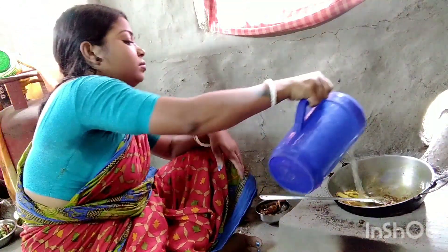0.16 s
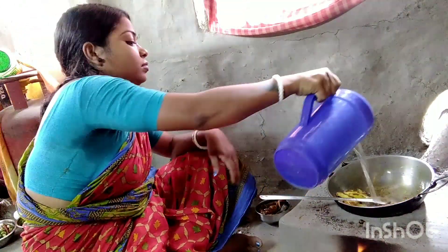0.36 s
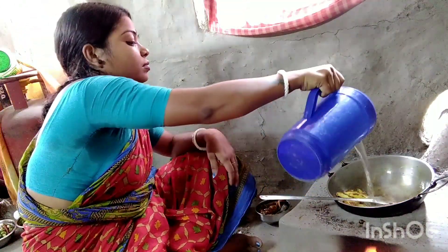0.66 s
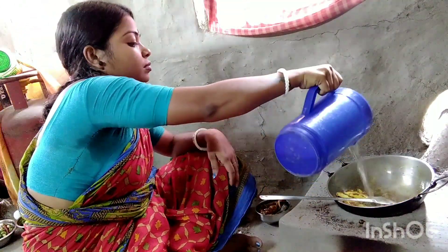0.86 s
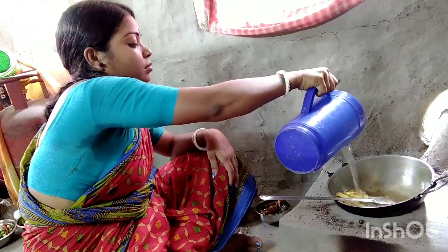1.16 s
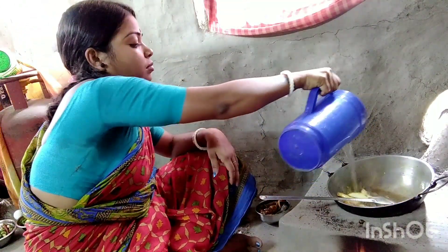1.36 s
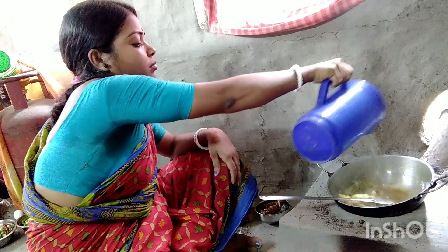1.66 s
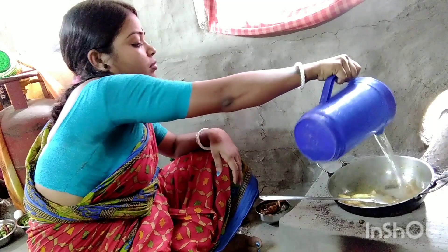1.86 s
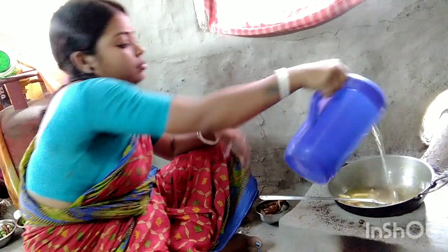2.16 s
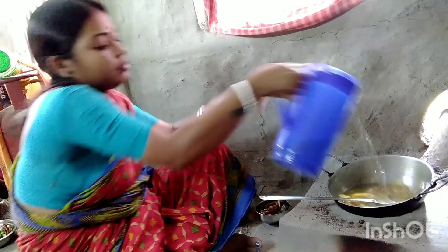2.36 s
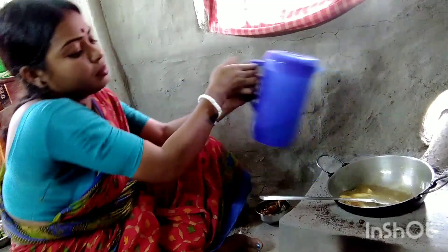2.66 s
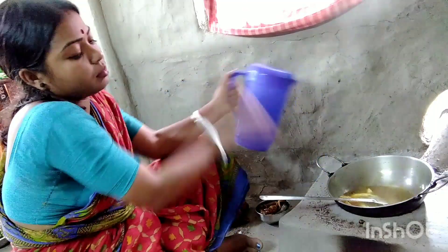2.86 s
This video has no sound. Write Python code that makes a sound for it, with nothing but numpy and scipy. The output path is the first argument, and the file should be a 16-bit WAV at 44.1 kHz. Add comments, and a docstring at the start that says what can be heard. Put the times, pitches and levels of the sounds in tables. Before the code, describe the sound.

A fierce hiss of steam erupts as water lands in a frying pan, with coarse boiling crackle and faint metallic ringing, easing into sparse spitting; close stereo microphone, pan slightly right, short room reflections, soft low rumble.

```python
"""At a stove beside a plastered wall, water is poured from a jug into a steel pan of spices in hot oil.
The frying flares into a dense sizzle: random steam bursts and filtered noise. Coarser boiling crackles,
bubbles sound as short rising notes, and random knocks excite the resonances of the pan.
As the pan cools the sizzle sinks and single spits, shaped noise, stand out. Water slaps and gurgles;
low filtered noise and wavering sines make the rumble, drone and hum underneath."""
import sys
import numpy as np
from scipy import signal
from scipy.fft import rfft, irfft
from scipy.io import wavfile
from scipy.ndimage import uniform_filter1d, map_coordinates

SR = 44100
rng = np.random.default_rng(int(sys.argv[2]) if len(sys.argv) > 2 else 0)


def waveform_to_disk(signal):
    """Save audio, clipped to [-1, 1], as 16-bit WAV at the path in sys.argv[1]."""
    frames = np.transpose(np.atleast_2d(signal))
    scaled = np.clip(frames, -1, 1) * 32767
    samples = np.round(scaled).astype(np.int16)
    wavfile.write(sys.argv[1], SR, samples)


N = 132300
T = np.arange(N) / SR
FREQS = np.maximum(np.arange(N // 2 + 1) * SR / N, 1)
PORT_LAG_S = 0.0002

# Spectrum of the sizzle at the two microphone ports.
# Each row: frequency in Hz, left relative level in dB, right relative level in dB.
FIZZ_SPECTRUM = [(500, -49, -64), (2500, -34.5, -34), (4060, -18, -16), (5080, -13.5, -11.5),
                 (6320, -12.5, -7), (7130, -7, -1), (7350, -9, -2), (8360, -3.5, -7), (9150, -3, -8),
                 (10000, -5, -13), (11040, -8.5, -17.5), (11950, -13, -14.5), (14500, -15, -18.5)]
# Strength of the pan's ringing, which the churning water follows more weakly.
# Each row: time in seconds, relative level in dB.
RINGING_LEVEL = [(0, -62.5), (.32, -56.5), (.42, -54.5), (.8, -52), (1.1, -49), (1.6, -50), (2.1, -52),
                 (2.6, -53.5), (3, -55)]


def undb(db):
    """Amplitude ratio: 20 dB is a factor of ten."""
    return 10 ** (np.asarray(db) / 20)


def unit(x):
    """Normalization: scale to an rms of 1."""
    return x / np.sqrt(np.mean(x ** 2))


def curve(rows):
    """Envelope: gain over time, interpolated in dB between (s, dB) points."""
    return undb(np.interp(T, *np.array(rows).T))


def colour(x, rows):
    """Linear filtering: weight the spectrum by (Hz, dB) points, one dB column for all or one per channel."""
    hz, *columns = np.array(rows, float).T
    gains_db = [np.interp(np.log(FREQS), np.log(hz), column) for column in columns]
    return irfft(rfft(x) * undb(gains_db), N)


def resonate(x, hz, width_hz):
    """Simple resonance: gain 1 at the centre, 3 dB down at the edges of its width."""
    return irfft(rfft(x) / (1 + 1j * (FREQS - hz * hz / FREQS) / width_hz), N)


def noise():
    """Incoherence: unrelated white noise for the two channels."""
    return rng.standard_normal((2, N))


def flutter(rate, depth_db):
    """Random modulation: a smooth gain made from rate random steps a second."""
    k = int(SR / rate)
    steps = np.repeat(rng.standard_normal(N // k + 2), k)
    smooth = uniform_filter1d(uniform_filter1d(steps, k), k)[:N]
    return undb(depth_db * 1.3 * smooth)  # 1.3 makes up for the spread lost in smoothing


def pops(per_s, scatter_db):
    """Random point process: many weak bursts and few strong; each reaches the two ports differently."""
    size = undb(scatter_db * np.minimum(rng.exponential(size=N), 5))
    happens = rng.random(N) < per_s / SR
    return unit(happens * size * noise())


def smear(ticks, decay_s):
    """Exponential energy decay: each tick trails off as a brief spurt of noise."""
    power = np.mean(ticks ** 2, axis=0)
    energy = signal.lfilter([1], [1, -np.exp(-1 / (SR * decay_s))], power)
    return unit(np.sqrt(energy) * noise())


def burst(start, attack, decay):
    """Transient envelope: a quick linear rise and an exponential fall."""
    age = np.maximum(T - start, 0)
    return np.minimum(age / attack, 1) * np.exp(-np.maximum(age - attack, 0) / decay)


def ports(x):
    """Time difference of arrival: the pan stands to the right, so the left port hears it later."""
    return np.array([np.interp(T - PORT_LAG_S, T, x), x])


def room(x):
    """Reverberation: direct sound plus a short diffuse tail from the walls."""
    t60_s, tail_gain = 0.11, undb(10)
    tail = noise() * undb(-60 * T / t60_s)
    tail /= np.sqrt(np.sum(tail ** 2, axis=1, keepdims=True))
    reflected = irfft(rfft(x) * rfft(tail), N)
    return (x + tail_gain * reflected) / np.hypot(1, tail_gain)


def sizzle():
    """Flash boiling: tiny steam bursts, each a tick and a brief spurt, over the hiss of the vapour."""
    # Each row: time in seconds, relative level in dB.
    sizzle_level = [(0, -41.5), (.25, -40), (.3, -36.5), (.36, -32.5), (.43, -30.5), (.5, -32.5),
                    (.55, -30.5), (.7, -29.5), (1.02, -30), (1.15, -28.5), (1.28, -30), (1.48, -29),
                    (1.6, -30.5), (1.665, -29.5), (1.7, -32.5), (1.87, -33), (2.13, -31.5), (2.25, -33),
                    (2.32, -34.5), (2.365, -36.5), (2.43, -35), (2.565, -39.5), (2.6, -37.5), (2.72, -37),
                    (2.84, -38.5), (3, -39.5)]
    peak_bursts_per_s, scatter_db, burst_decay_s = 7000, 1, 0.0025
    steam_share, tick_share = 0.78, 0.13  # of the power
    strength = curve(sizzle_level)
    density = strength / strength.max()
    # Bursts come more often as the sizzle grows; the division keeps their mean power even.
    ticks = pops(peak_bursts_per_s * density, scatter_db) / np.sqrt(density)
    spurts = smear(ticks, burst_decay_s)
    grains = np.sqrt(tick_share) * unit(ticks) + np.sqrt(1 - tick_share) * spurts
    mix = np.sqrt(1 - steam_share) * grains + np.sqrt(steam_share) * noise()
    return unit(shimmer(colour(mix, FIZZ_SPECTRUM), depth_db=0.88)) * strength


def shimmer(x, depth_db, count=7):
    """Band-wise modulation: overlapping bands flicker on their own as clusters of bursts come and go."""
    centres_hz = np.linspace(3000, 14000, count)
    spectrum = rfft(x)
    out = 0
    for band in np.eye(count):
        weight = np.interp(FREQS, centres_hz, band)  # triangles; the end bands extend outward
        out = out + irfft(spectrum * weight, N) * flutter(70, depth_db)
    return out


def spits():
    """Transient radiation: single drops boil off in the oil, each in a short, bright spurt."""
    # Each row: start in seconds, level in dB, decay in seconds, centre in Hz.
    drops = [(0.095, -34, .007, 7000), (.187, -36.5, .018, 7700), (.299, -37, .02, 10500),
             (.35, -29, 0.0086, 7300), (.852, -28, 0.012, 8000), (1.459, -25, .008, 7640),
             (1.655, -25.5, .009, 7600), (2.065, -35, 0.049, 5730), (2.136, -35, 0.046, 5900),
             (2.387, -31, .007, 7100), (2.6, -32, 0.0084, 9500), (2.614, -31, .005, 7040),
             (2.666, -38, .005, 7600), (2.69, -35, 0.014, 9000), (2.756, -34, .007, 7500),
             (2.784, -32.5, .008, 6900), (2.854, -31, .007, 6460), (2.895, -38, 0.0054, 9000)]
    attack_s, width_hz = 0.0014, 540
    spurt = colour(noise(), FIZZ_SPECTRUM)
    out = 0
    for start, db, decay, hz in drops:
        out = out + undb(db) * unit(resonate(spurt, hz, width_hz)) * burst(start, attack_s, decay)
    return out


def boiling():
    """Nucleate boiling: larger steam blisters crackle lower down, and small simmering bubbles ring."""
    # Each row: time in seconds, relative level in dB.
    boil_level = [(0, -50.5), (.12, -50), (.29, -50), (.37, -45), (.62, -41), (.74, -41.5), (.84, -43),
                  (1, -43.5), (1.16, -41.5), (1.3, -41.5), (1.5, -42), (1.8, -44), (2.03, -47), (2.2, -45),
                  (2.38, -50), (2.47, -49), (2.56, -54), (2.62, -49.5), (2.76, -49), (3, -52.5)]
    # Each row: frequency in Hz, left relative level in dB, right relative level in dB.
    crackle_spectrum = [(400, -28, -23), (1000, -20, -14), (1700, -10, -6.5), (2100, -5, -3),
                        (2600, -2.5, -3), (3050, .5, -.5), (3400, -2.5, -3.5), (4100, 1.5, -.5),
                        (5300, -5, 1.5), (8000, -24, -19)]
    ticks = pops(2200, scatter_db=1.5)
    blisters = unit(room(undb(-4) * ticks + smear(ticks, decay_s=0.0036)))
    crackle = unit(slosh(colour(blisters, crackle_spectrum), depth_db=.4))
    simmer = bubbles(3500, octaves=.45, cycles=30, count=1500)
    boil = crackle + undb(-2) * unit(colour(simmer, crackle_spectrum))
    return unit(boil) * curve(boil_level) * flutter(35.52, 0.72)


def pan():
    """Forced vibration: stream and bursts ring the pan unevenly; air dragged under bubbles up."""
    # Each row: resonance in Hz, width in Hz, left relative level in dB, right relative level in dB.
    resonances = [(694, 29, 0.5, 1), (805, 67, 1, 1), (1001, 88, 0, 0), (1116, 84, -40, 1.5),
                  (1322, 65, -0.5, 7), (1674, 140, -9.5, 0), (1893, 127, -3, 3), (2053, 44, -3, -4)]
    knocks = pops(1400, scatter_db=1)
    drive = ports(knocks[0]) + 0.76 * noise()  # shared knocks plus a part unrelated between ports
    ring = 0
    for hz, width, left, right in resonances:
        mode = resonate(resonate(drive, hz, width), hz, 4 * width)  # second pass steepens the skirts
        ring = ring + undb([[left], [right]]) * mode * flutter(25, 1.2)
    air = bubbles(1900, octaves=.25, cycles=14, count=260)
    return (unit(slosh(ring, depth_db=.18)) + undb(-8) * air) * curve(RINGING_LEVEL)


def bubbles(centre_hz, octaves, cycles, count):
    """Bubble resonance: scattered sizes ring in short rising notes, all over the pan."""
    rise = .2
    out, age = np.zeros((2, 2 * N)), T[:SR // 12]
    moments, pitches = rng.random(count), rng.standard_normal(count)
    sizes, places = rng.exponential(size=count), rng.standard_normal(count)
    for when, pitch, size, place in zip(moments, pitches, sizes, places):
        hz = centre_hz * 2 ** (octaves * np.clip(pitch, -2, 2))
        life = age * hz / cycles  # age in decay times
        bend = 1 + rise / cycles * np.minimum(life, 2)
        note = np.sqrt(size) * np.sin(2 * np.pi * hz * age * bend) * np.exp(-life)
        left_lag_s = PORT_LAG_S * abs(1 + place / 2)
        for channel, lag_s in enumerate([left_lag_s, 0]):
            at = int(when * N + lag_s * SR)
            out[channel, at:at + len(age)] += note
    return unit(room(out[:, :N]))


def slosh(x, depth_db):
    """Varying resonance: moving water shifts pitch up and down; depth is the pitch ratio's spread in dB."""
    speed = flutter(24, depth_db)
    place = np.cumsum(speed / speed.mean())
    return np.array([map_coordinates(channel, [place], mode="mirror") for channel in x])


def splats():
    """Impact noise: the uneven stream lands in gouts, each a short wet slap on the pan."""
    # Each row: start in seconds, level in dB, centre in Hz.
    gouts = [(.173, -40.5, 2940), (0.178, -50, 1400), (0.331, -36, 3280), (0.473, -34, 3240),
             (0.508, -44, 1100), (1.165, -36, 2900), (1.268, -40, 3300), (1.445, -44, 1480),
             (1.709, -47, 1310), (1.915, -47, 1300), (1.948, -34.5, 3500), (2.02, -47, 1170),
             (2.112, -49, 3000), (2.27, -50, 1400), (2.413, -48.5, 1250), (2.465, -50, 3400),
             (2.61, -43, 3320), (2.728, -48, 3000), (2.8, -48, 3600)]
    attack_s, decay_s, relative_width = 0.002, 0.0081, 0.65  # width as a share of the centre, per pass
    out = 0
    for start, db, hz in gouts:
        width_hz = hz * relative_width
        wet = resonate(resonate(noise(), hz, width_hz), hz, width_hz)
        out = out + undb(db) * unit(wet) * burst(start, attack_s, decay_s)
    return out


def churn():
    """Flow noise: the stream stirs the pooled water with a soft, low gurgle."""
    # Each row: frequency in Hz, relative level in dB.
    churn_spectrum = [(80, 1.5), (160, -0.5), (270, 2), (410, -3.5), (470, -0.5), (545, -8), (700, -4),
                      (1500, -21.5), (5000, -42)]
    water = unit(colour(ports(noise()[0]) + 0.44 * noise(), churn_spectrum))
    swell = unit(curve(RINGING_LEVEL) ** 0.32)  # follows the ringing, compressed
    return undb(-60) * water * swell * flutter(24.54, 1.3)


def background():
    """Coherent low sound: a rumble alike in both ports but for the lag, a swelling drone, a wavering hum."""
    # Each row: frequency in Hz, relative level in dB.
    rumble_spectrum = [(15, -5.5), (30, -5), (48, 5.5), (62, -10), (78, 4.5), (98, -7), (120, -13),
                       (200, -34), (600, -71)]
    # Rumble, then drone. Each row: time in seconds, level in dB (relative, for the drone).
    rumble_level = [(0, -62), (.3, -62), (.57, -58), (.8, -64), (1.22, -70), (1.41, -56), (1.62, -65),
                    (2.2, -63.5), (3, -66)]
    drone_level = [(0, -68), (.16, -57), (.42, -57.5), (.7, -69), (1.2, -75), (1.4, -64), (1.65, -64),
                   (1.85, -89), (2.5, -76), (3, -67)]
    # Each row: multiple of the hum's fundamental, level in dB.
    hum_partials = [(1, -62.5), (2, -75.5)]
    rumble = unit(colour(ports(noise()[0]), rumble_spectrum)) * curve(rumble_level)
    # Both pitches wander; the depth in dB is the spread of the frequency ratio.
    drone_hz = 77 * flutter(14, .6)
    drone = unit(np.sin(2 * np.pi * np.cumsum(drone_hz) / SR)) * curve(drone_level)
    hum_hz = 43.2 * flutter(5.2, .3)
    phase = 2 * np.pi * np.cumsum(hum_hz) / SR
    hum = 0
    for multiple, db in hum_partials:
        partial = np.sin(round(multiple) * phase) * flutter(6.12, 2.5)
        hum = hum + undb(db) * unit(partial)
    return rumble + ports(drone + hum)


def scene():
    """Superposition: everything at the stove, over the background."""
    frying = undb(4.0) * sizzle() + spits() + undb(2.58) * boiling()
    return frying + undb(0.88) * pan() + splats() + churn() + background()


def record(dry):
    """Band limiting: the recorder cuts the top steeply above 14210 Hz."""
    low_pass = signal.ellip(12, .1, 80, 14210, fs=SR, output="sos")  # order, ripple dB, stopband dB
    return signal.sosfilt(low_pass, dry)


dry = scene()
out = record(dry)
waveform_to_disk(out)
```